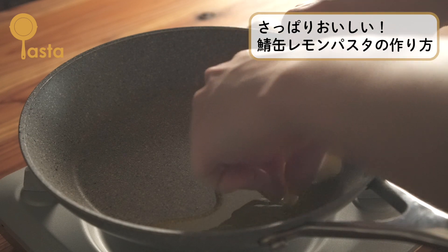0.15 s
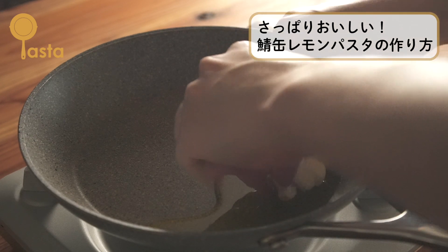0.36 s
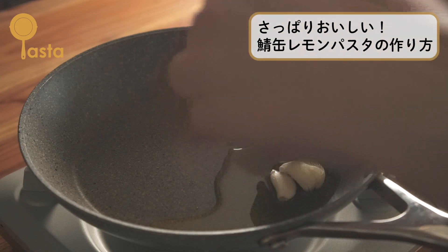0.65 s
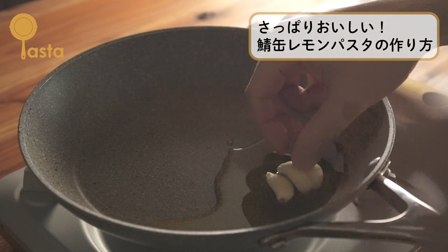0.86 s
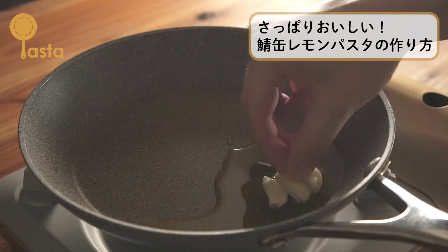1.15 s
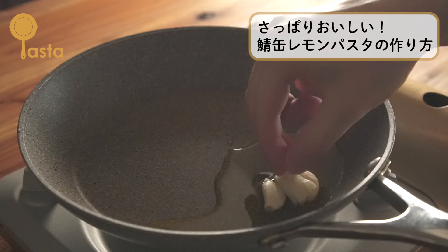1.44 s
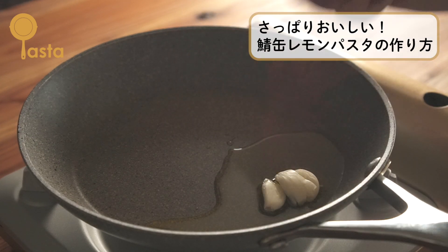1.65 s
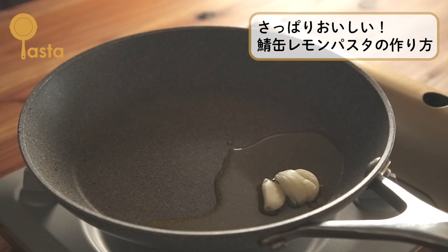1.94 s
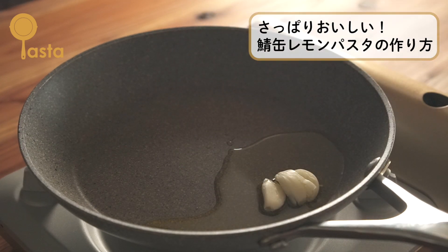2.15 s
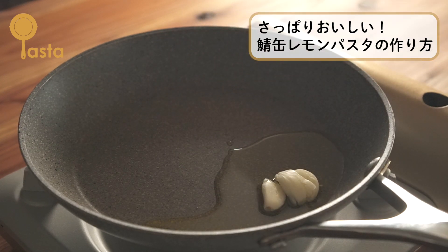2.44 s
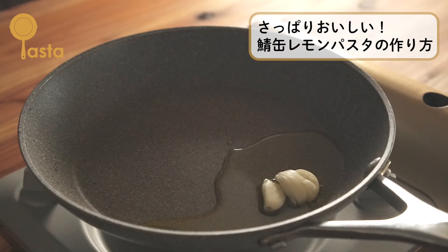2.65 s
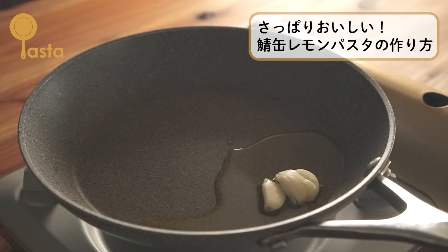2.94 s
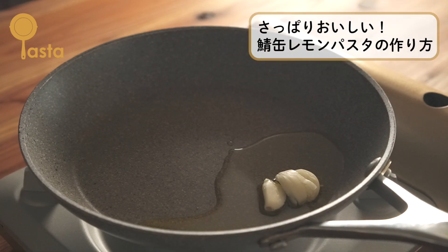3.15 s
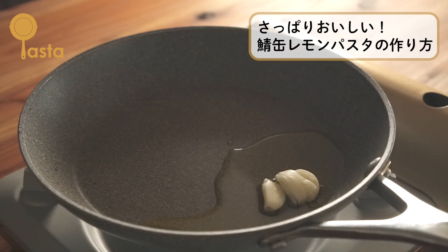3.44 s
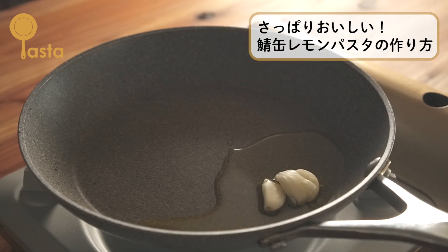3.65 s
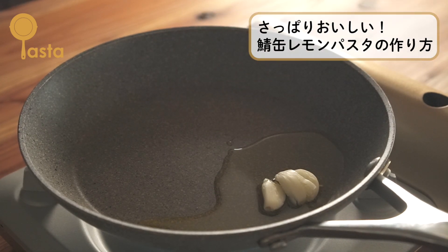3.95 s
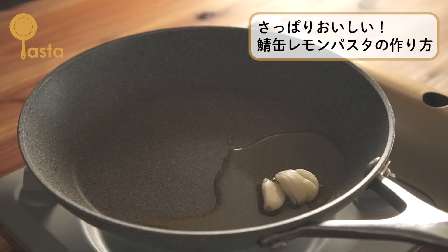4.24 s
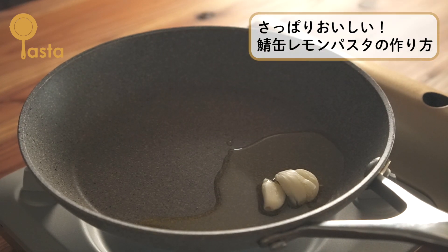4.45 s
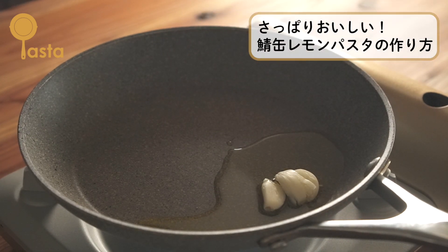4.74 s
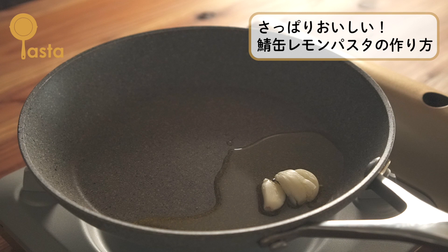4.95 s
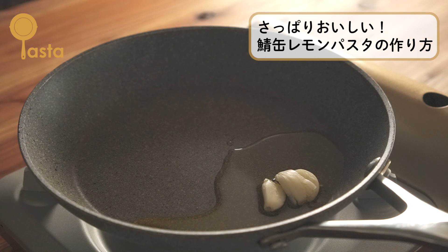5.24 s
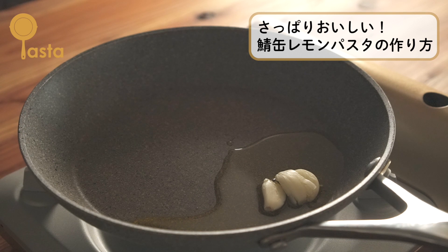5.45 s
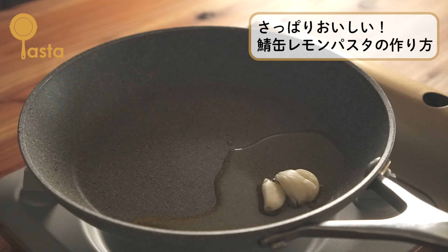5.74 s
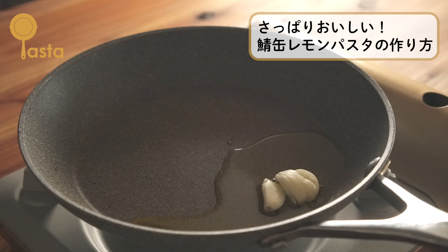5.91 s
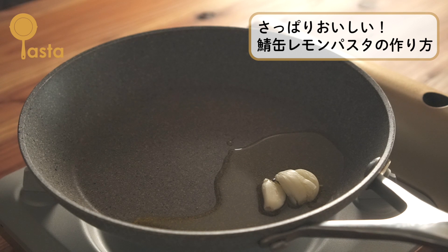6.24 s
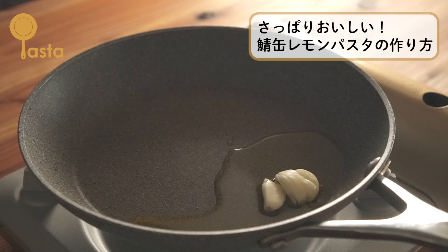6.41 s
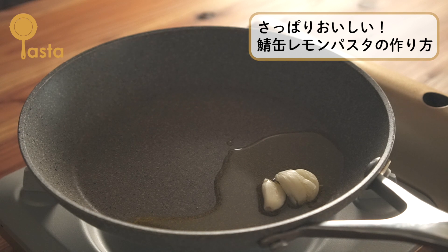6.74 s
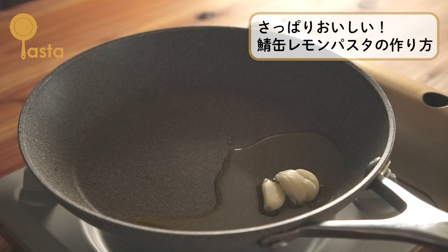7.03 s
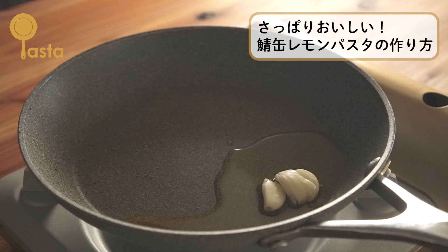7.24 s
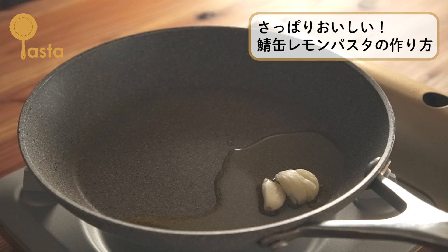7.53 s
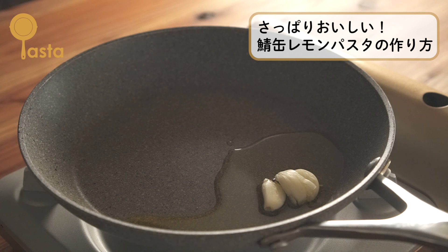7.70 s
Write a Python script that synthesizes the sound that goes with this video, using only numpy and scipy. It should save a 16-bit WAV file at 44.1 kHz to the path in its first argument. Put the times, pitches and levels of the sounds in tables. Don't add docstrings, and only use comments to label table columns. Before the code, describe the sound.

In a small kitchen with a droning fan, a gas burner's lever and knob clack, gas hisses, a sharp igniter snap brings a whooshing flame, then it is turned down.

```python
import sys
import numpy as np
from scipy import signal
from scipy.io import wavfile
from scipy.ndimage import uniform_filter1d

SR = 44100
rng = np.random.default_rng(int(sys.argv[2]) if len(sys.argv) > 2 else 0)


def volts(x):
    e = np.asarray(x, float) / 20
    return 10 ** e


def bounce(signal):
    frames = np.transpose(np.atleast_2d(signal))
    limited = np.clip(frames, -1, 1)
    pcm = np.round(limited * 32767).astype(np.int16)
    wavfile.write(sys.argv[1], SR, pcm)


N = 346966

# (frequency [Hz], density [dB])
FAN = [(8.8, -29), (15, 2), (43, -1.5), (116, -7), (164, -13.5), (286, -16), (382, -17.5), (417, -22.5),
       (628, -16.5), (685, -22), (1460, -21), (2270, -28.5), (16000, -63.5)]
FAN_DB = -41
# (frequency [Hz], width [Hz], level [dB])
DUCT = [(735.6, 22.5, 7), (1148, 14, 2.5), (1400, 58, -2.5)]
# (frequency [Hz], width [Hz], lift [dB])
ROOM_MODES = [(74.6, 1.6, -18), (103, 6.1, 2), (120, 6.8, 3), (176.2, 5.3, 6), (206, 7, 0),
              (251.4, 9.2, 1.5), (296.6, 7.3, 5.5), (359.4, 5.6, 7), (383, 8.9, 3), (475.5, 7.9, 7),
              (654, 11, -1)]
MIC_HISS_DB, EDGE_HZ = -68, 15800

# (time [s], peak [dB], centre [Hz])
TICKS = [(0.2319, -48, 4350), (0.9727, -47, 7320), (0.985, -48, 7000), (0.99, -47, 8000),
         (1.0044, -44, 9000), (1.0194, -43, 9500), (1.0544, -45, 7890), (1.062, -46, 7500),
         (1.2305, -43, 7500), (1.297, -44, 9000), (1.3, -34, 5000), (1.3339, -43, 11000), (1.44, -39, 7290),
         (1.4544, -41, 7110), (2.0644, -53, 4220), (2.65, -32, 3500), (6.4694, -40, 8020)]
# (start [s], rise [s], fade [s], peak [dB])
BRUSH = [
    (0.95, .04, 0.24, -57.5),
    (1.29, .01, 0.076, -57),
    (1.42, 0.034, .025, -60),
    (1.75, 0.051, 0.073, -62),
    (1.92, .1, .02, -65),
    (2.035, .027, .04, -61),
]
# (start [s], rise [s], fade [s], peak [dB])
SLEEVE = [
    (7.2, 0.24, .3, -54.5),
    (7.5, 0.14, 0.44, -54),
]

# (time [s], frequency [Hz], level [dB], length [s])
THUD = ((2.625, 22, -33, .04))
# (frequency [Hz], width [Hz], level [dB])
LEVER = ([(2.429, -39, -16, -21, 0.16), (2.452, -35, -19, -30, 0.25), (2.49, -11, -21, -31, 0.17),
          (2.498, -12, -21, -27, 0.14), (2.514, -16, -35, -50, 0.065), (2.506, -17, -25, -40, 0.08),
          (2.527, -28, -30, -45, 0.11)], [(456, 33, -5.5), (1004, 20, -2), (1180, 15, 3), (1370, 15, 4.5),
          (1500, 80, -7), (1940, 66, 5), (2200, 60, -10), (2630, 23, -14), (2940, 92, -17), (4060, 71, -6)])
LATCH = ([(2.6565, -24, -13, -8, 0.1), (2.658, -11.5, -18, -19, 0.13), (2.661, -15, -23, -29, 0.17),
          (2.682, -24.5, -16, -28, 0.23)], [(1040, 90, -1.5), (1430, 90, 0), (1835, 33, -1),
          (2510, 82, 1.5), (2890, 53, 2), (3850, 28, -3.5), (4830, 72, -3.5), (6850, 35, -10),
          (7660, 35, -4), (8500, 39, -18), (11400, 53, -15), (14000, 32, -20), (15100, 27, -32)])
VALVE = ([(2.757, -19, -11, -15, 0.15), (2.766, -21, -12, -19, 0.22), (4.079, -44.5, 0, -32, 0.32)],
          [(690, 130, -2), (1490, 280, 4.5), (3460, 440, 6), (5320, 23, -18), (5470, 35, 0), (6830, 93, -9),
          (7800, 23, 1), (8100, 22, -3)])
STOP = ([(2.801, -12.5, -17, -21, 0.11), (2.8065, -19, -30, -35, 0.1), (2.8125, -15.5, -36, -37, 0.15),
         (2.824, -24, -36, -37, 0.11), (2.848, -33, -36, -40, 0.15)], [(120, 75, -2.5), (480, 35, -5),
         (740, 32, 0.5), (995, 81, 0), (1320, 40, -8), (1825, 35, -1.5), (2270, 20, -22), (3360, 13, -75)])
IGNITER = ([(2.9215, 3, -6.5, -6, 0.038), (2.9265, -6, -9, -16, 0.036), (2.981, -11, -7.5, -31, 0.31),
            (3.083, -12.5, -22, -21, 0.1), (2.972, -18, -10, -25, 0.11)], [(1060, 200, -13),
            (1480, 170, 7.5), (1950, 260, 11.5), (2550, 52, 0), (2670, 13, -11), (3230, 11, 0),
            (3870, 40, -1), (4330, 28, -17)])
WARMING = ([(3.1547, -25, -20, -29, 0.058), (3.1717, -23.5, -16, -36, 0.069), (3.1974, -29, -19, -27, 0.06),
            (3.2444, -36, -20, -30, 0.06), (3.3408, -28.5, -29, -40, 0.075), (3.3614, -26, -20, -40, 0.11),
            (3.3944, -39, -16, -21, 0.06), (3.5109, -39, -21, -35, 0.06)], [(1770, 230, 2), (2500, 200, 1),
            (3320, 200, -11)])
TRIVET = ([(3.803, -13.5, -23.5, -60, 0.14), (3.81, -13, -29, -60, 0.12)], [(692, 14, 14), (910, 12, 8),
           (1030, 34, 8), (1415, 44, -14), (2030, 47, 0), (2380, 30, 0), (3050, 24, -1)])
KNOB = ([(5.242, -33, -27, -26, 0.21), (5.266, -19, -19, -30, 0.11), (5.268, -14, -30, -40, 0.15),
         (5.275, -19, -26, -40, 0.12), (5.283, -24, -26, -40, 0.1), (5.296, -30, -26, -40, 0.12),
         (5.306, -33, -26, -40, 0.12)], [(936, 40, 2), (1160, 65, -11), (1375, 51, 4.5), (1670, 47, 1),
         (1916, 31, 5), (2110, 27, -1), (2870, 38, -3), (3470, 60, -4), (5000, 100, -8), (7000, 300, -6.5),
         (8000, 150, -19)])
SPRING = ([(5.367, -21, -36, -45, 0.18), (5.374, -17, -17, -25, 0.18), (5.381, -17.5, -23, -35, 0.14),
           (5.391, -13, -24, -33, 0.082), (5.3995, -16, -19, -37, 0.059), (5.4155, -29, -12, -37, 0.28),
           (5.428, -32, -22, -37, 0.1), (5.408, -20, -26, -37, 0.08), (5.435, -32, -22, -40, 0.1)],
           [(950, 35, -1), (1230, 80, -3), (1420, 46, 1), (1750, 28, 0), (1810, 45, 0.5), (2030, 17, 1.5),
           (2150, 25, -6), (2300, 22, -7), (2720, 35, -13), (4060, 82, -3), (4670, 37, -21),
           (8300, 97, -13)])
SLACK = 0.027
# (time [s], frequency [Hz], level [dB], t60 [s])
PINGS = [
    (3.08, 7400, -28, 0.027),
    (3.0825, 14000, -33, .03),
    (3.3614, 7300, -46, 0.035),
]
# (frequency [Hz], level [dB], t60 [s])
SPRING_TAIL = (5.39, [(2070, -31, 0.27), (2130, -27, 0.19), (2350, -32, 0.28)])

# (time [s], flow [0 low, 1 full, more before it burns])
JET = [
    (2.74, 1.6),
    (2.88, 1.85),
    (2.97, 0.84),
    (3.4, 0.4),
    (4.05, 1.04),
    (4.45, 1.05),
    (4.65, 0.87),
    (5.0, .05),
    (7.87, .05),
]
# (frequency [Hz], density [dB])
HISS = [(900, -2), (1700, -5.5), (2300, -4), (3200, -24), (3700, -12.5), (4800, -14.5), (5700, -16.5),
        (7300, -16.5), (8300, -10), (9300, -11.5), (9900, -22), (11500, -23.5), (16000, -20)]
# (frequency [Hz], width [Hz], level [dB])
PIPE = [(2750, 74, 4), (3248, 160, 6.5), (3500, 25, 3.5), (4090, 50, -4), (4750, 35, 0), (4950, 57, 0.5),
        (6170, 52, -1.5), (6390, 22, -1), (6620, 49, 1.5), (6890, 28, 0), (7210, 60, -5), (7560, 35, 3.5),
        (8040, 46, 0), (9050, 40, -5)]
# (cold [Hz], warm [Hz], width [Hz], level [dB])
SURGE = [(9000, 8400, 300, 3), (14100, 14950, 300, 0), (14250, 14300, 200, 0), (12500, 14000, 250, -1)]
# (frequency [Hz], width [Hz], level [dB], fall [dB])
COLD_BAND = (9000, 200, -72.5, 21)
FLOW_DB, FLOW_RANGE_DB = -60, 2.5
SURGE_DB, SURGE_RANGE_DB = -78, 9
TOP_HZ, TOP_DB, TOP_RANGE_DB = 14600, -22, 2
WHISTLE_HZ, WHISTLE_DB = 7960, -53.5
COLD_DB, WARM_FROM_S, WARM_IN_S, UNLIT_DB = -11, 3.64, 0.91, 14.5
# (frequency [Hz], width [Hz], level [dB])
UNLIT_TONES = [(6230, 70, -60), (7550, 90, -60)]
UNLIT_S, UNLIT_RISE_S = 2.84, .03

# (time [s], peak [dB], length [s])
POP = ((2.9214, -0.5, 0.00041))
# (time [s], level [dB], hold [s], fall [dB/s])
RUSH = [
    (2.9208, -17.5, 0.06, 258),
    (3.072, -38, .008, 370),
    (3.15, -49, 0.028, 220),
]
# (frequency [Hz], width [Hz], level [dB])
RUSH_RING = [(840, 18, -1), (1020, 22, 0), (1360, 40, -4), (1595, 19, 2), (1704, 49, 3), (2013, 35, 7.5),
             (2550, 42, -15), (2710, 41, -7), (3200, 55, -15), (3440, 59, -9), (4090, 150, -7),
             (4460, 90, -7), (4810, 60, -13)]
RUSH_RISE_S = .002
RUSH_TREBLE_DB, DULLING = -8.5, 0.28

# (time [s], peak [dB], centre [Hz])
PUFFS = [(3.39, -20, 581), (3.44, -29, 497), (3.494, -20.5, 600), (3.607, -34, 608), (3.695, -33, 589),
         (3.955, -21, 550), (3.983, -27, 552), (4.056, -24, 600), (4.123, -26, 600), (4.37, -26, 616),
         (4.562, -25, 580), (4.609, -29, 503)]
PUFF_S = 0.0068
# (time [s], roar [dB])
FLAME = [(2.93, -38), (2.99, -29.5), (3.05, -31), (3.1, -28.5), (3.45, -27.5), (3.7, -29.5), (4.0, -29.5),
         (4.4, -29), (4.7, -32), (5.1, -37.5), (7.87, -37.5)]
CALM_DB = -37.5
# (frequency [Hz], density [dB])
ROAR = [(60, -41), (110, -16), (170, 2), (250, 6), (330, 2), (400, 0), (500, -8), (750, -23.5), (1200, -38),
        (2000, -70)]
# (frequency [Hz], width [Hz], level [dB])
UNDER_PAN = [(373, 28, 6), (460, 3.4, -12), (588, 14, 12), (666, 46, 6)]
# (time [s], length [s], swell [dB], brightness [+ hollow and edge, - deep roar])
GUSTS = [(3.01, 0.019, 2.8, 0.12), (3.11, 0.052, 7.2, 0.11), (3.16, 0.027, 6.6, 0.92),
         (3.231, 0.023, 6.7, 0.6), (3.29, 0.03, 1.4, 1.2), (3.35, 0.032, 8.4, 0.12),
         (3.5, 0.0094, 2.2, 0.27), (3.59, 0.017, 1.5, -0.6), (3.7, 0.048, 1.6, 1.1),
         (3.77, 0.053, 8.2, 0.18), (3.86, 0.037, 5.3, 0.18), (3.966, 0.014, 12.6, 0.24),
         (4.03, 0.032, 5.6, 1.1), (4.065, 0.0075, 2.6, 0.31), (4.13, 0.0066, 1.3, 0.63),
         (4.14, 0.16, 1.5, -1.3), (4.3, 0.034, 2.7, -0.068), (4.38, 0.058, 2.9, -0.031),
         (4.49, 0.032, 2.2, -0.72), (5.72, 0.13, 2.8, 0.95), (5.98, 0.031, 2, -0.91),
         (6.38, 0.018, 1.5, -1.2), (6.49, 0.024, 4, -0.19), (6.64, 0.031, 2.3, -0.13),
         (7.6, 0.058, 5.2, 0.63), (7.82, 0.018, 3.6, -0.76)]
TINT_DB = 0.67
SETTLES_S = 3.365
BUFFET_DB, BUFFET_END_S, FRINGE_DB, FRINGE_END_S = 12, .021, 8.5, 0.21
RUMBLE_DB, RUMBLE_PER_DB = -46, 0.59
BODY_DB, BODY_PER_DB = -47.5, 1.9138
EDGE_DB, EDGE_PER_DB = -58.5, 1.83
WANDER_DB = 1.8


def evened(x):
    return x / np.sqrt(np.mean(x ** 2) + 1e-20)


def add(mix, s, sound):
    part = mix[round(s * SR):][:len(sound)]
    part += sound[:len(part)]


def band(x, lo_hz, hi_hz):
    edges = np.clip([lo_hz, hi_hz], 5, .49 * SR)
    return evened(signal.sosfilt(signal.butter(2, edges, "band", fs=SR, output="sos"), x))


def resonate(x, hz, width):
    r = np.exp(-np.pi * width / SR)
    c = r * np.cos(2 * np.pi * hz / SR)
    return signal.lfilter([2 * (1 - r), -2 * (1 - r) * c], [1, -2 * c, r * r], x)


def resonant_noise(x, hz, width, second_width):
    return evened(resonate(resonate(x, hz, width), hz, second_width))


def ringing(x, peaks):
    modes = (volts(db) * resonate(x, hz, width) for hz, width, db in peaks)
    return evened(sum((-1) ** k * mode for k, mode in enumerate(modes)))


def glide(x, hz, width):
    turn = np.exp(2j * np.pi * np.cumsum(hz) / SR)
    r = np.exp(-np.pi * width / SR)
    at_zero_hz = signal.lfilter([1], np.convolve([1, -r], [1, -r]), x / turn)
    return evened((turn * at_zero_hz).real)


def noise(points, patchy_db, flicker_db):
    frames, hz = N // 256 + 5, np.fft.rfftfreq(1024, 1 / SR)
    real, imag, patches = rng.standard_normal((frames, 513, 3)).T
    patches = uniform_filter1d(patches, size=10, axis=0)
    patches = evened(uniform_filter1d(patches, size=16, axis=1))
    flicker = evened(uniform_filter1d(rng.standard_normal(frames), size=6))
    f, db = np.transpose(points)
    colour_db = np.interp(np.log(hz + 1), np.log(f + 1), db)[:, None]
    z = (real + 1j * imag) * volts(colour_db + patchy_db * patches + flicker_db * flicker)
    return evened(signal.istft(z, nperseg=1024, noverlap=768)[1][:N])


def played(rows, fade):
    s, *columns = np.transpose(rows)
    t = np.arange(N) / SR
    gate = np.clip((t - s[0]) / fade, 0, 1) * np.clip((s[-1] + fade - t) / fade, 0, 1)
    return gate, *(np.interp(t, s, c) for c in columns)


def wander():
    steps = uniform_filter1d(rng.standard_normal(N // 1024 + 2), size=3)
    return evened(np.interp(np.arange(N) / 1024, np.arange(len(steps)), steps))


def fan():
    duct = ringing(rng.standard_normal(N), DUCT)
    drone = noise(FAN, patchy_db=.7, flicker_db=.15)
    drone = drone + sum(volts(db) * resonate(drone, hz, width) for hz, width, db in ROOM_MODES)
    return volts(FAN_DB) * (drone + volts(-11.5) * duct)


def kitchen(x):
    t = np.arange(SR // 2) / SR
    turn = np.pi * np.arange(N) / SR / .012
    out = 0
    for k in range(3):
        taps = rng.choice([-1., 1.], len(t)) * (rng.random(len(t)) < 2000 / SR) * (t > .006)
        tail = band(taps, 210, 6900) * volts(-60 * t / 0.29)
        tail = tail + band(taps, 4300, 22000) * volts(-60 * t / 0.37)
        share = np.sqrt(2 / 3) * np.cos(turn + k * np.pi / 3)
        out = out + signal.oaconvolve(x * share, tail / np.linalg.norm(tail))[:N]
    return out


def stroke(start, rise, fade, db):
    t = np.arange(0, rise + 2 * fade, 1 / SR)
    out = np.zeros(N)
    add(out, start, volts(db - 20 * np.maximum(t - rise, 0) / fade) * np.minimum(t / rise, 1))
    return out


def fingers():
    out, t = np.zeros(N), np.arange(1500) / SR
    for s, db, hz in TICKS:
        snap = band(rng.standard_normal(len(t)), 0.58 * hz, 1.3 * hz)
        add(out, s, volts(db - 9) * snap * (np.exp(-t / 0.0014) + 0.24 * np.exp(-t / 0.016)))
    sizes = volts(3.6 * np.minimum(rng.exponential(1, N), 3))
    sizes = sizes * (rng.random(N) < 900 / SR)
    grains = band((0.44 + sizes) * rng.standard_normal(N), 4100, 10000)
    out += sum(stroke(*row) for row in BRUSH) * grains
    cloth = band(rng.standard_normal(N), 650, 7100)
    return out + sum(stroke(*row) for row in SLEEVE) * cloth


def thud(s, hz, db, length):
    t = np.arange(N) / SR - s
    return volts(db) * np.sin(2 * np.pi * hz * t) * np.exp(-(t / length) ** 2)


def knock(db, mid_db, treble_db, t60, peaks):
    t = np.arange(SR // 3) / SR
    low, mid, high, bumps = rng.standard_normal((4, len(t)))
    rattle = volts(1.8 * evened(uniform_filter1d(bumps, size=70)))
    shake = (rattle + 1.54 * np.exp(-t / 0.0016)) * volts(-60 * t / t60) * np.minimum(t / 0.00069, 1)
    blow = low * shake + 3.1 * np.exp(-((t - .0003) / .00007) ** 2)
    rings = 0
    for (hz, width, mode_db), slip in zip(peaks, bumps):
        slack_hz = hz * (1 + SLACK * slip)
        damped = 0.86 * width + hz / 26
        mode = resonate(resonate(blow, slack_hz, damped), slack_hz, 0.42 * slack_hz)
        rings = rings + volts(mode_db) * mode / np.sqrt(damped)
    main_hz = max(peaks, key=lambda p: p[2])[0]
    skirt = band(band(blow, 0.58 * main_hz, 1.61 * main_hz), 590, 6100)
    body = evened(rings) + 0.73 * band(band(blow, 720, 1570), 670, 7100) + 0.43 * skirt
    mid = band(band(mid, 2400, 7900), 2200, 8500) * volts(mid_db - 8.5) * shake
    high = band(high, 7100, 15600) * volts(treble_db - 9 - 35 * t / t60) * shake
    return volts(db + 1.5) * (body / abs(body).max() + mid + high)


def ring(modes):
    t = np.arange(SR // 3) / SR
    return sum(volts(db - 60 * t / t60) * np.sin(2 * np.pi * hz * t) for hz, db, t60 in modes)


def unlit():
    air, out = rng.standard_normal(SR // 10), np.zeros(N)
    tones = sum(volts(db) * resonant_noise(air, hz, w, w) for hz, w, db in UNLIT_TONES)
    add(out, UNLIT_S, tones * np.minimum(np.arange(len(air)) / SR / UNLIT_RISE_S, 1))
    return out


def jet():
    gate, flow = played(JET, fade=0.094)
    t = np.arange(N) / SR
    cold = np.clip(1 - (t - WARM_FROM_S) / WARM_IN_S, 0, 1)
    warm = np.clip((t - 3.3) / 1.0, 0, 1)
    air, eddies = rng.standard_normal((2, N))
    hiss = noise(HISS, patchy_db=2.0, flicker_db=1.0)
    hiss = hiss + volts(-4.5) * ringing(air, [(hz, 0.69 * w, db) for hz, w, db in PIPE])
    hiss = hiss + volts(TOP_DB + TOP_RANGE_DB * flow) * resonant_noise(air, TOP_HZ, 160, 200)
    hiss = volts(FLOW_DB + FLOW_RANGE_DB * flow + 8.5) * hiss
    surge = evened(sum(volts(db) * glide(eddies, a + (b - a) * warm, w) for a, b, w, db in SURGE))
    surge = volts(SURGE_DB + SURGE_RANGE_DB * np.minimum(flow, 1.4)) * surge
    whistle_db = WHISTLE_DB + COLD_DB * cold + UNLIT_DB * np.maximum(flow - 1, 0)
    whistle = volts(whistle_db - 4) * resonant_noise(eddies, WHISTLE_HZ, 260, 280)
    hz, width, db, fall_db = COLD_BAND
    chill = volts(db - fall_db * (0.5 - cold)) * resonant_noise(air, hz, width, width)
    return gate * (chill + hiss + surge + whistle)


def pop(db, length):
    u = np.arange(2000) / SR / length
    return volts(db) * (1 - u) * np.exp(-u)


def rush():
    start, main_db = RUSH[0][:2]
    t = start + np.arange(SR) / SR
    level = sum(volts(db - fall * np.maximum(t - s - hold, 0)) * np.clip((t - s) / RUSH_RISE_S, 0, 1)
                for s, db, hold, fall in RUSH)
    bright = volts(RUSH_TREBLE_DB) * np.minimum(level / volts(main_db), 1) ** DULLING
    bumps = evened(uniform_filter1d(rng.standard_normal(SR), size=50))
    rough = rng.standard_normal(SR) * volts(1.9 * bumps)
    hollow = np.clip((start + 0.24 - t) / 0.045, .15, 1)
    body = 0.79 * hollow * ringing(rough, [(hz, 1.1 * w, db) for hz, w, db in RUSH_RING])
    body = body + 1.1 * band(rough, 720, 5100)
    treble = band(rough, 4800, 9300) + .5 * band(rough, 8500, 15500)
    return level * (body + bright * treble)


def puffs():
    out, t = np.zeros(N), np.arange(3000) / SR
    envelope = np.exp(-t / PUFF_S) * np.minimum(t / 0.0018, 1)
    for s, db, hz in PUFFS:
        burst = band(rng.standard_normal(len(t)), 0.66 * hz, 1.42 * hz) * envelope
        add(out, s, volts(db) * burst / abs(burst).max())
    return out


def gusts():
    t = np.arange(0, N, 128) / SR
    lifts = 0
    for s, length, swell_db, tint in GUSTS:
        shares = [1 - TINT_DB * tint, 0.5 + TINT_DB * tint]
        lifts = lifts + np.outer(shares, swell_db * np.exp(-((t - s) / length) ** 2))
    return [np.interp(np.arange(N) / SR, t, lift) for lift in lifts]


def flame():
    gate, db = played(FLAME, fade=0.041)
    t, size_db = np.arange(N) / SR, db - CALM_DB
    deep_db, bright_db = gusts()
    buffet_db = BUFFET_DB * np.clip(1 - (t - SETTLES_S) / BUFFET_END_S, 0, 1)
    fringe_db = FRINGE_DB * np.clip(1 - (t - SETTLES_S) / FRINGE_END_S, 0, 1)
    pulses, deep, hollow, tips = rng.standard_normal((4, N))
    flutter = volts(0.82 * band(pulses, 17, 60))
    roar = volts(db + deep_db) * noise(ROAR, patchy_db=0.5, flicker_db=1.5)
    rumble_db = RUMBLE_DB + RUMBLE_PER_DB * size_db + buffet_db + WANDER_DB * wander()
    rumble = volts(rumble_db) * band(band(deep, 6.4, 180), 5.8, 186)
    hollow = band(band(hollow, 320, 660), 334, 630)
    body_db = BODY_DB + BODY_PER_DB * size_db + bright_db
    body = volts(body_db) * evened(hollow + 0.27 * ringing(hollow, UNDER_PAN))
    edge_db = EDGE_DB + EDGE_PER_DB * size_db + fringe_db + bright_db + 0.6 * WANDER_DB * wander()
    edge = band(band(tips, 700, 1250), 600, 1050) + 0.17 * band(tips, 1800, 2380)
    edge = volts(edge_db - 3.5) * edge
    return gate * flutter * (roar + rumble + (body + edge) * flutter ** 0.34)


def scene():
    near = puffs()
    add(near, RUSH[0][0], rush())
    for s, *ping in PINGS:
        add(near, s, ring([ping]))
    add(near, SPRING_TAIL[0], ring(SPRING_TAIL[1]))
    add(near, POP[0], pop(*POP[1:]))
    for blows, peaks in (LEVER, LATCH, VALVE, STOP, IGNITER, WARMING, TRIVET, KNOB, SPRING):
        for s, *blow in blows:
            add(near, s, knock(*blow, peaks))
    stove = near + volts(-12.5) * kitchen(near) + thud(*THUD)
    return (stove + flame() + jet() + unlit() + fingers() + fan())[None]


def low_pass(x):
    return signal.sosfilt(signal.butter(12, 16440, fs=SR, output="sos"), x)


def record(dry):
    hiss = volts(MIC_HISS_DB) * band(rng.standard_normal(N), 5600, 14800)
    x = np.clip(dry + hiss, -.93, .93)
    lowpass = signal.firwin(801, EDGE_HZ, window=("kaiser", 10), fs=SR)
    low = signal.oaconvolve(x, lowpass[None], "same")
    top = x - low
    power = uniform_filter1d(top ** 2, size=200)
    sharp = power > 40 * np.roll(power, 500) + volts(-102)
    mix = low + .3 * top * uniform_filter1d(1. * sharp, size=200)
    return low_pass(mix)


dry = scene()
out = record(dry)
bounce(out)
```